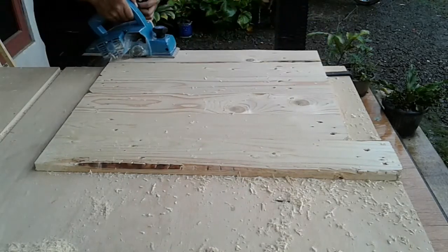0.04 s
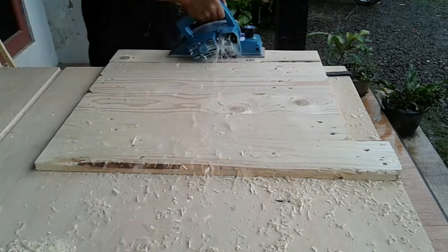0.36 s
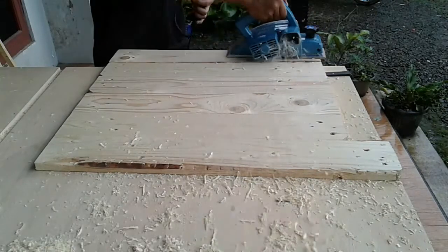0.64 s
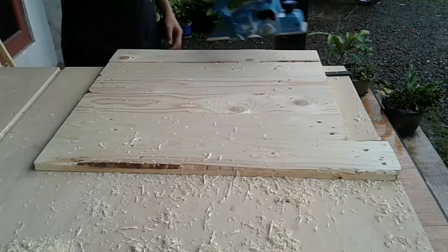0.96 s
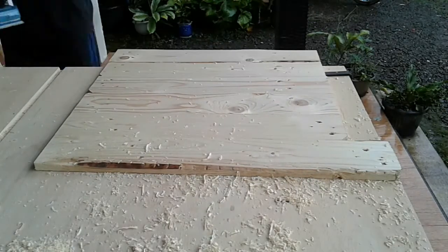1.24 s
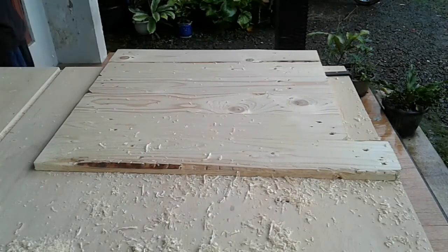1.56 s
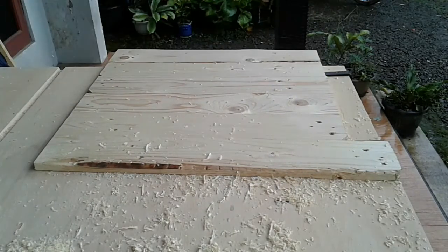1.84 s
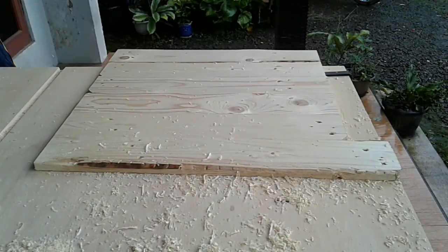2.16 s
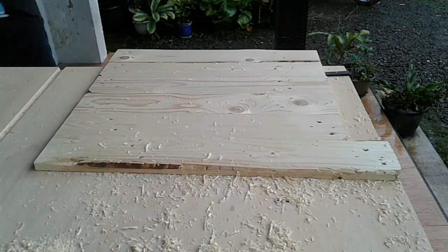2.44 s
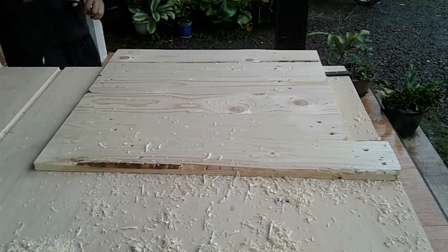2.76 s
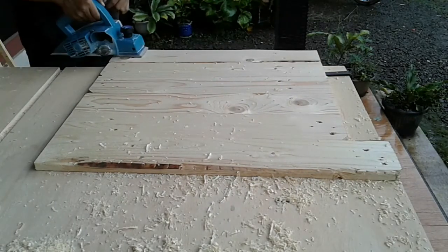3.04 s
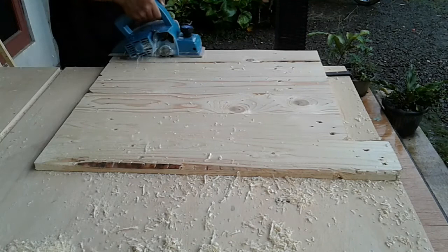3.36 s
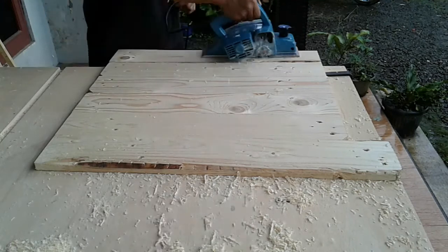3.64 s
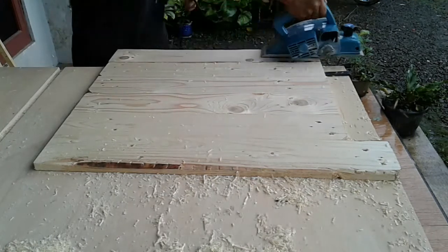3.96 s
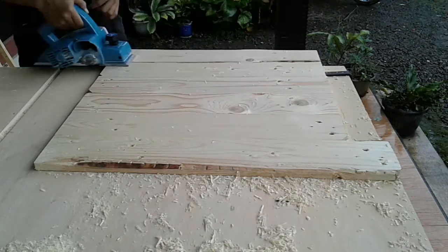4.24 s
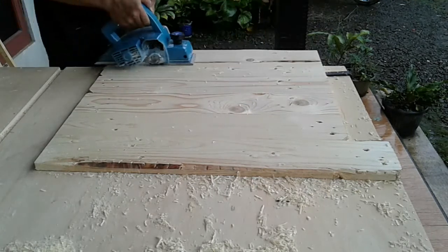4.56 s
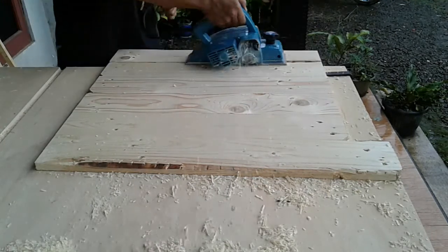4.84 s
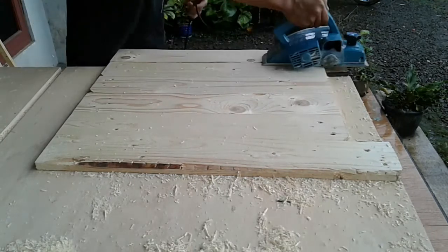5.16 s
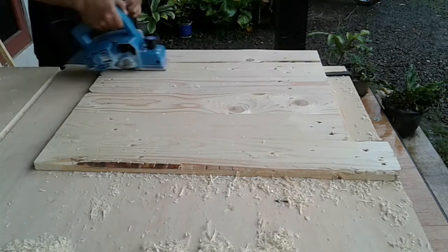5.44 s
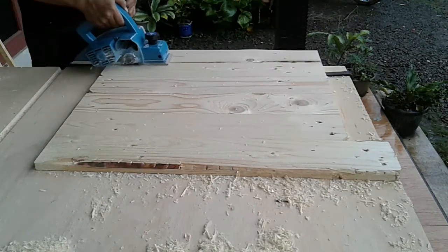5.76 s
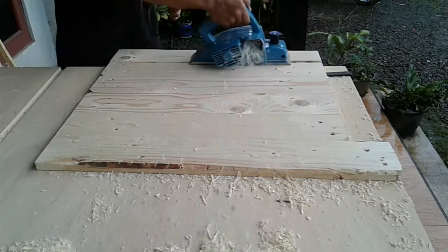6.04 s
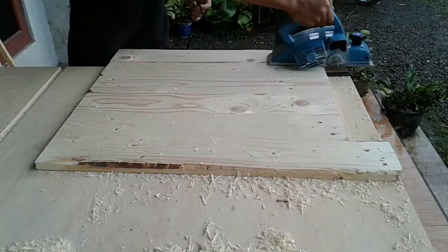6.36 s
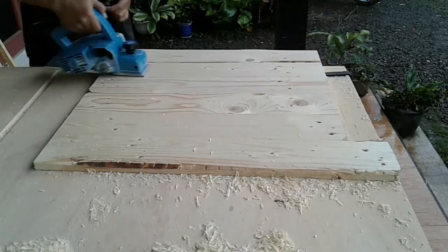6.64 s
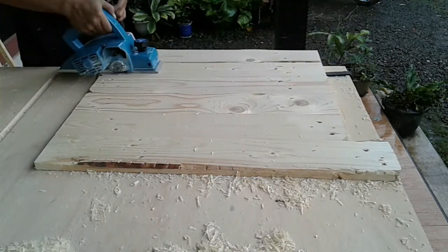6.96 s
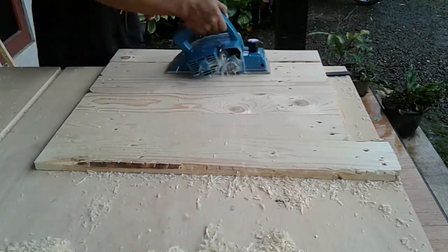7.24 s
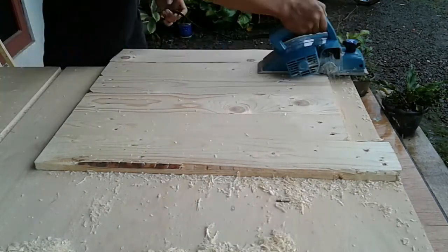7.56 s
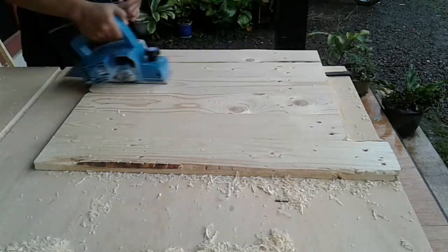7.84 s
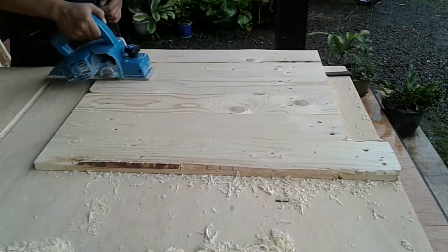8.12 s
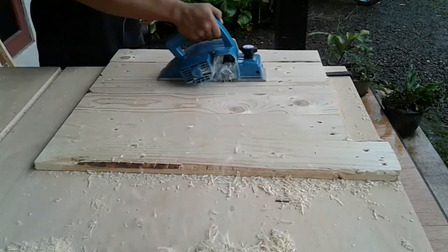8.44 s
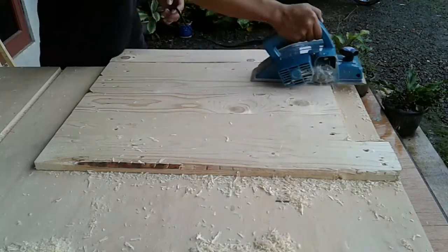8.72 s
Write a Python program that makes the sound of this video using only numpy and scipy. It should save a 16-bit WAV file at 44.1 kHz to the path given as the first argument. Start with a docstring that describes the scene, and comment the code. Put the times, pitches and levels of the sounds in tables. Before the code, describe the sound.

An electric hand planer is already cutting a wooden panel about a metre away, with a siren-like howl, rushing air, bright hiss and a crackling rasp of chips. The stroke ends at 0.8 seconds; the motor is switched off and its whine falls steadily. Faint squeaks come just after 2 seconds, then light handling ticks and a soft knock at 2.9. At 3 seconds it restarts with a sputtering, quickly rising whine and cuts until 3.9. Four more strokes follow at about 4.4 to 5.2, 5.6 to 6.4, 6.9 to 7.6 and 8.1 to 8.8 seconds. The pitch sags during each of these and climbs again between them. The tool's base knocks and briefly buzzes on the board, mostly between cuts. The open workshop gives short reflections over very faint outdoor noise.

```python
"""An open workshop, where an electric hand planer works along a wooden panel about a metre away.
Its knife drum howls like a siren and sags in pitch as the knives bite, each one snapping off a chip.
The motor hums and whistles, the fan rushes, the brushes hiss and the sole knocks on the board.
After the first stroke it is switched off and coasts down, is set on the board, restarts and makes
five more strokes. Nearby walls answer briefly, and a quiet yard lies beneath."""
import sys
import numpy as np
from scipy import signal
from scipy.fft import rfft, irfft, next_fast_len
from scipy.io import wavfile
from scipy.ndimage import uniform_filter1d, map_coordinates

SR = 44100
rng = np.random.default_rng(int(sys.argv[2]) if len(sys.argv) > 2 else 0)


def dump_mix(stems):
    """Bounce the given channels to the path in sys.argv[1] as a 16-bit WAV at rate SR."""
    frames = np.atleast_2d(stems).T  # one column per channel
    limited = np.clip(frames, -1, 1)  # hard clip at full scale
    pcm = np.round(limited * 32767).astype(np.int16)
    wavfile.write(sys.argv[1], SR, pcm)


N = 396459

OFF_S, ON_S = 0.921, 2.973  # the switch opens, then closes again
CRAWL_HZ = 60  # slowest knife rate, in knife passes a second

# Bright sizzle of brushes and splinters. Each row: frequency in Hz, relative level in dB.
SIZZLE = [(2000, -53), (4500, -37), (6500, 5), (8500, 3), (10000, 3), (11500, 1.5), (14000, 5.5),
          (16000, -2)]
# Low body of the shaking bench and panel. Each row: frequency in Hz, relative level in dB.
RUMBLE = [(20, 0), (120, -.5), (300, 1.5), (450, 0), (650, -3), (1200, -14), (3000, -40)]
# Strokes along the board. Each row: knives enter and leave in seconds, then rasp level,
# sharp edge level, entry surge and exit surge in dB.
STROKES = [(-0.15, 0.823, -24.5, -21.5, 0, 4.5), (3.131, 3.919, -27.5, -22.5, 11, 8),
           (4.355, 5.185, -26, -22, 1.5, 9.5), (5.635, 6.363, -30.5, -24, 13, 13.5),
           (6.856, 7.61, -28, -22, 3.5, 8.5), (8.05, 8.801, -29, -23, 4.5, 8.5)]


def amp(db):
    """Decibels to gain."""
    return 10 ** (np.asarray(db) / 20)


def unit(x):
    """Scale to rms 1."""
    return x / np.sqrt(np.mean(x ** 2) + 1e-20)


def along(points, hz):
    """Read (Hz, value) points on a log frequency axis."""
    freqs, values = np.transpose(points)
    return np.interp(np.log(hz + 1), np.log(freqs), values)


def curves(rows, at):
    """Each column after the first, read at the given values of the first."""
    x, *columns = np.transpose(rows)
    return [np.interp(at, x, column) for column in columns]


def wobble(rate):
    """A smooth random curve, rate knots a second."""
    at = np.linspace(0, N, 8000)
    coarse = map_coordinates(rng.standard_normal(int(N * rate / SR) + 4), [at * rate / SR])
    return np.interp(np.arange(N), at, coarse)


def filtered(x, response):
    """Filter x by a response given as a function of Hz."""
    size = next_fast_len(N + SR // 2)
    return irfft(rfft(x, size) * response(np.fft.rfftfreq(size, 1 / SR)), size)[..., :N]


def coloured(x, spectrum):
    """EQ x with a (Hz, dB) curve and scale it to rms 1."""
    return unit(filtered(x, lambda hz: amp(along(spectrum, hz))))


def noise(patchy_db):
    """White noise with drifting patches of random gain."""
    bins = signal.stft(rng.standard_normal(N), nperseg=512)[2]
    patches = uniform_filter1d(rng.standard_normal(bins.shape), size=3, axis=0)
    patches = uniform_filter1d(patches, size=22, axis=1)
    return unit(signal.istft(bins * amp(patchy_db * unit(patches)))[1][:N])


def add_burst(track, start_s, db, t60):
    """Mix in a noise burst that falls 60 dB in t60 seconds."""
    t = np.arange(SR // 5) / SR
    burst = amp(db - 60 * t / t60) * rng.standard_normal(len(t))
    part = track[round(start_s * SR):][:len(t)]
    part += burst[:len(part)]


def partial(cycles, flutter, drift_db):
    """A sine of rms 1, fluttering in the turbulent air and drifting in level as the tool moves."""
    phase = 2 * np.pi * (cycles + rng.random()) + flutter * wobble(170)
    return unit(np.sin(phase) * (1 + flutter * wobble(170)) * amp(drift_db * wobble(7)))


def speed_db(rate, rated_db, per_octave):
    """Level that is rated_db at a knife rate of 700 Hz and gains per_octave dB as the speed doubles."""
    return rated_db + per_octave * np.log2(rate / 700)


def knife_rate(now):
    """Knife passes a second: sagging in wood, recovering in air, coasting down, leaping at the restart."""
    # The drum labouring, one list a stroke. Each point: time in seconds, knife rate in Hz.
    loaded = [
        [(0.0, 721), (0.06, 680.4), (0.136, 648.1), (0.234, 640), (0.296, 616.2), (0.39, 611.3), (0.476, 597.0),
         (0.604, 584.4), (0.682, 590.2), (0.825, 593.6)],
        [(3.1, 537.1), (3.134, 575.6), (3.208, 627.9), (3.296, 663.4), (3.376, 687.7), (3.556, 708.9),
         (3.618, 725.1), (3.634, 722), (3.714, 692.5), (3.92, 667.4)],
        [(4.36, 806), (4.442, 785), (4.526, 753), (4.688, 709.8), (4.832, 694.5), (4.876, 676), (4.91, 664),
         (4.958, 657.4), (5.118, 667), (5.18, 653.4)],
        [(5.64, 803), (5.67, 800.6), (5.798, 751.3), (5.88, 741), (6.038, 710), (6.102, 670), (6.152, 671),
         (6.254, 675), (6.308, 674), (6.36, 663)],
        [(6.89, 813), (6.958, 791.5), (7.022, 767.4), (7.248, 689.4), (7.308, 683.7), (7.396, 692.5),
         (7.45, 680.6), (7.572, 678), (7.6, 665)],
        [(8.08, 819), (8.136, 793), (8.25, 719), (8.32, 679), (8.38, 671), (8.484, 637), (8.564, 613),
         (8.64, 603), (8.716, 606.2), (8.8, 624.5)],
    ]
    free_hz, restart_hz = 839.4, 149.6
    drag_s, friction_hz = 2.25, 620.5  # air drag and friction brake the coasting rotor
    rate = np.zeros(N)
    for stroke in loaded:
        (begin, _), (end, end_hz) = stroke[0], stroke[-1]
        recover_s = 0.25 * (end_hz / 660) ** 1.6  # quicker from a deep sag
        regained = (free_hz - end_hz) * (1 - np.exp(-np.maximum(now - end, 0) / recover_s))
        rate = np.where((now >= begin) | (rate == 0), curves(stroke, now)[0] + regained, rate)
    coast = (np.interp(OFF_S, now, rate) + friction_hz) * np.exp((OFF_S - now) / drag_s) - friction_hz
    coast = np.maximum(coast, CRAWL_HZ)
    running_s, running_hz = loaded[1][0]
    progress = np.clip((now - ON_S) / (running_s - ON_S), 0, 1)
    spin_up = restart_hz + (running_hz - restart_hz) * progress ** 0.85
    return np.select([now < OFF_S, now < ON_S, now < running_s], [rate, coast, spin_up], rate)


def travel(now):
    """Place in the round trip: 0-1 along the cut, 1-2 on the lifted way back."""
    held_place, lift_s = 1.42, 0.21  # where the tool waits as it coasts, and the time to get there
    marks = [(s, 2 * k + end) for k, stroke in enumerate(STROKES) for end, s in enumerate(stroke[:2])]
    marks += [(STROKES[0][1] + lift_s, held_place), (ON_S, held_place)]
    marks += [(STROKES[-1][1] + 0.39, 2 * len(STROKES))]
    return curves(sorted(marks), now)[0] % 2


def bite(now):
    """Wood contact (0-1) and gains of rasp and edge; the bite is hardest at the ends and in tough wood."""
    # Tough patches in the wood. Each row: centre and half length in seconds, extra bite in dB.
    tough = [(0.095, 0.031, 0.5), (0.485, 0.035, 3.5), (0.757, 0.1, 6), (3.65, 0.16, 3), (4.874, .025, 6),
             (5.767, 0.016, 5.5), (6.089, 0.031, 4.5), (8.52, .02, 6), (8.624, 0.023, 7)]
    grip_s, release_s = 0.007, 0.008
    entry_delay_s, entry_width_s, exit_s = 0.035, 0.034, 0.061
    tough_db = sum(db * np.exp(-((now - s) / half) ** 2) for s, half, db in tough) + 1.95 * wobble(14)
    contact, rasp, edge = np.zeros((3, N))
    for enter, leave, rasp_db, edge_db, entry_db, exit_db in STROKES:
        near = (now > enter - 0.1) & (now < leave + 0.1)
        t = now[near]
        grip = (1 + np.tanh((t - enter) / grip_s)) / 2 * np.exp(-np.maximum(t - leave, 0) / release_s)
        surge_db = tough_db[near] + entry_db * np.exp(-((t - enter - entry_delay_s) / entry_width_s) ** 2)
        surge_db += exit_db * np.exp(-np.abs(t - leave) / exit_s)
        contact[near] += grip
        rasp[near] += grip * amp(rasp_db + surge_db)
        edge[near] += grip * amp(edge_db + 0.61 * surge_db)  # only part of a surge reaches the treble
    return contact, rasp, edge


def yard():
    """A faint, slowly shifting bed of outdoor noise."""
    # Tone of the yard. Each row: frequency in Hz, relative level in dB.
    spectrum = [(15, -51), (25, -16), (33, -38), (119, -33), (173, -18), (274, -6.5), (389, -4.5),
                (421, -6.5), (537, -7), (614, -10.5), (997, -10), (1110, -15), (2060, -16), (15500, -30)]
    return amp(-51) * coloured(noise(patchy_db=4), spectrum)


def walls(x):
    """A short, thin answer from the nearby walls."""
    # Decay of the reflections. Each row: frequency in Hz, time to fall 60 dB in seconds.
    decay = [(200, 0.21), (2000, 0.094), (12000, 0.023)]
    hz, t, bins = signal.stft(rng.standard_normal(SR // 3), SR, nperseg=256)
    tail = signal.istft(bins * amp(-60 * t / along(decay, hz)[:, None]))[1]
    return signal.fftconvolve(x, np.pad(tail, (300, 0)) / np.linalg.norm(tail))[:N]


def drive_squeaks(now):
    """The drive sings briefly as it runs down."""
    # Each row: centre in seconds, pitch in Hz, half length in seconds, level in dB.
    squeaks = [(2.02, 1380, .04, -54), (2.161, 2125, 0.059, -51), (2.227, 1220, 0.047, -53)]
    return sum(amp(db - 9.2 * ((now - s) / half) ** 2) * partial(hz * now, flutter=0.33, drift_db=-2)
               for s, hz, half, db in squeaks)


def handling_ticks():
    """A hand ticks against the shell of the resting tool."""
    # Each row: start in seconds, relative level in dB, time to fall 60 dB in seconds.
    touches = [(2.502, -49, 0.12), (2.5413, -38, 0.11), (2.564, -48, 0.11), (2.7182, -41, 0.1),
               (2.8044, -43, 0.11)]
    shell = [(1200, -20), (3100, 0), (4500, 0), (6200, -5), (9000, -13), (15000, -14)]  # Hz, dB
    ticks = np.zeros(N)
    for s, db, t60 in touches:
        add_burst(ticks, s, db, t60)
    return amp(-11) * filtered(ticks, lambda hz: unit(amp(along(shell, hz))))


def sole_knocks():
    """The sole lands on the panel: a woody clack over a dull thud from the bench."""
    # Each row: start in seconds, relative levels of clack and thud in dB.
    knocks = [(2.902, -32.5, -35), (2.93, -44, -53), (4.134, -26.5, -58), (4.826, -27.5, -47),
              (5.404, -28.5, -47), (6.077, -30, -43), (6.589, -30, -50), (7.039, -40, -42),
              (7.829, -31, -56), (8.079, -39, -40)]
    # Modes of the panel. Each row: frequency and width in Hz, relative level in dB.
    modes = [(430, 110, -7.5), (614, 120, 2.5), (1250, 450, 7), (1800, 180, 7), (2310, 180, 4),
             (3920, 500, -20)]
    bench = [(60, -32), (200, -15), (380, 0), (600, -4), (1500, -38), (5000, -70)]  # Hz, dB
    clack, thud = np.zeros((2, N))
    for s, clack_db, thud_db in knocks:
        add_burst(clack, s, clack_db, t60=0.065)
        add_burst(thud, s, thud_db, t60=0.063)

    def panel(hz):
        """The panel's resonances, summed with alternating polarity."""
        return unit(sum((-1) ** k * amp(db) * 1j * hz * width / (centre ** 2 - hz ** 2 + 1j * hz * width)
                        for k, (centre, width, db) in enumerate(modes)))

    return amp(-7) * filtered(clack, panel) + amp(4) * filtered(thud, lambda hz: unit(amp(along(bench, hz))))


def sole_chatter(now):
    """The front of the sole buzzes as it settles on the panel, ringing one of its modes."""
    # Each row: centre and half length in seconds, level in dB.
    buzzes = [(4.245, 0.042, -25.5), (5.591, 0.04, -25), (6.712, 0.021, -38), (6.811, 0.039, -23),
              (7.91, 0.042, -34)]
    touch = sum(amp(db - 10.6 * ((now - s) / half) ** 2) for s, half, db in buzzes)
    return touch * partial(825 * now, flutter=0.81, drift_db=3)


def bench_rumble(rate, contact, inrush):
    """The tool shakes the bench, harder in the cut and at the restart."""
    level_db = speed_db(rate, -56.5, per_octave=10.6) + 6.6 * contact + 6 * inrush + 1.5 * wobble(12)
    return amp(level_db) * coloured(noise(patchy_db=1.5), RUMBLE)


def sputter(now, inrush, mains_hz=50):
    """A gain that pulses with the starting current on every mains half-wave."""
    return amp(inrush * (3.5 * np.cos(4 * np.pi * mains_hz * now) + 2.5 * wobble(250) - 1.5))


def fan_rush(passes, rate, place, inrush):
    """The fan's air, chopped by the drum, meets the board as the sole comes down."""
    # Tone of the rush. Each row: frequency in Hz, relative level in dB.
    spectrum = [(200, -28), (500, -19.5), (850, -8), (1100, -5.5), (1400, -2.5), (1750, -0.5), (2300, 0),
                (3000, 1.5), (3900, 2.5), (4500, -1.5), (6000, 0), (8000, -11), (15000, -12.5)]
    # Air striking the board. Each row: place in the round trip, gain in dB.
    downwash = [(0, 1), (.15, -3), (.6, 0), (1, 1.5), (1.35, -1), (1.8, 1), (2, 2)]
    chop = 1 + 0.25 * np.cos(2 * np.pi * passes) + 0.21 * np.cos(np.pi * passes)
    flow_db = speed_db(rate, -26.5, per_octave=11.2) + curves(downwash, place)[0] + 2.2 * inrush
    flow = amp(flow_db) + amp(-27.5) * inrush
    return flow * coloured(noise(patchy_db=3.5) * chop, spectrum)


def brush_hiss(passes, rate, contact, inrush, power_off):
    """The brushes spark and hiss, and keep scraping until the rotor all but stops."""
    sparks = amp(1.6 * wobble(400)) * (1 + 0.13 * np.cos(2 * np.pi * passes))
    scrape = amp(-63) * np.clip((rate - CRAWL_HZ) / 25, 0, 1)
    hiss_db = speed_db(rate, -28.5, per_octave=9.74) + 0.3 * contact + 6 * inrush - 1.5 * power_off
    return (scrape + amp(hiss_db)) * coloured(noise(patchy_db=-0.4) * sparks, SIZZLE)


def motor_hum(passes, rate, inrush):
    """The belt-coupled armature and its fan hum between the harmonics of the drum."""
    # Each row: multiple of the knife rate, relative level in dB.
    tones = [(1.4, -16.5), (1.75, -2.5), (3.5, -7), (3.65, -10), (4.55, -9), (4.75, -7), (6.75, -10),
             (7.7, -9)]
    # Hum against speed. Each row: knife rate in Hz, gain in dB.
    levels = [(100, -85), (180, -68), (350, -66), (460, -52), (600, -42.5), (675, -50.5), (715, -31),
              (780, -32.5), (815, -30.5)]
    hum = sum(amp(db) * partial(k * passes, flutter=0.081 * k, drift_db=4) for k, db in tones)
    return amp(curves(levels, rate)[0] + 6.6 * inrush) * hum


def commutator_whistle(passes, rate, contact, inrush, power_off):
    """The commutator bars pass under the brushes with a breathy whistle that fades under load."""
    bars = 21 * passes
    fast = np.clip((rate - 350) / 130 + inrush, 0.15, 1)  # at low speed the octave takes over
    tone = fast * partial(bars, flutter=0.36, drift_db=0)
    tone += 2.7 * (1 - fast) * partial(2 * bars, flutter=1, drift_db=3)
    # uneven bars and hopping brushes spread each tone into a narrow band
    hop = coloured(rng.standard_normal(N), [(150, -9), (500, -5), (1100, 3), (2500, -39)])
    spread = 0.56 + 1.1 * inrush
    level_db = speed_db(rate, -26, per_octave=20) - 10 * contact + 16 * inrush - 5 * power_off
    return amp(level_db) * tone * (1 + spread * hop) / np.hypot(1, spread)


def chip_snaps(passes):
    """One click a knife pass as a chip snaps off; harder wood holds the knife back and snaps louder."""
    strike = np.interp(np.arange(1, int(passes[-1])), passes, np.arange(N))
    jitter, scatter = rng.standard_normal((len(strike), 2)).T
    hardness = wobble(90)[strike.astype(int)]
    strike += SR * (2.2e-6 * jitter + 5e-6 * hardness)
    size = amp(0.5 * scatter + 1.2 * hardness)
    # a windowed sinc places each click between samples
    taps = np.floor(strike)[:, None] + np.arange(-7, 9)
    offset = taps - strike[:, None]
    clicks = size[:, None] * np.sinc(offset) * np.cos(np.pi * offset / 16) ** 2
    return np.bincount(np.clip(taps, 0, N - 1).astype(int).ravel(), clicks.ravel(), N)


def cut(passes, rasp_gain, edge_gain):
    """Snapping chips rasp through the panel, splinters crackle away and a hard bite makes it shudder."""
    # The rasp and its sharp treble edge. Each row: frequency in Hz, relative level in dB.
    rasp_spectrum = [(1500, -39), (2400, -3), (2950, -5.5), (3500, -1.5), (4100, 1), (4700, -3),
                     (5400, 0.5), (6200, -6), (6800, -14), (8000, -29), (12000, -54)]
    edge_spectrum = [(4000, -35), (6300, -6.5), (7200, 1.5), (7800, -3), (8350, 2.5), (9000, 0), (10500, 0),
                     (13000, -0.5), (16000, -1.5)]
    snaps = chip_snaps(passes)
    echoed = snaps.copy()
    # echoes within the board shift as the planer travels
    for delay_ms, db in [(0.23, -1.5), (0.61, -0.5), (1.9, -2.5), (4.3, -2.5)]:
        lag = (delay_ms + 0.063 * wobble(4)) * SR / 1000
        echoed += amp(db) * map_coordinates(snaps, [np.arange(N) - lag])
    # bending waves in the panel smear each snap, treble arriving first
    smeared = filtered(echoed, lambda hz: np.exp(-2j * np.pi * 0.3 * np.sqrt(hz)))
    rasp = rasp_gain * coloured(smeared, rasp_spectrum)
    edge = amp(1.2) * edge_gain * coloured(smeared, edge_spectrum)
    splinters = rng.standard_normal(N) * (rng.random(N) < 900 / SR)  # about 900 a second
    crackle = amp(-28) * edge_gain * coloured(splinters, SIZZLE)
    shudder = amp(-26.5) * rasp_gain * coloured(noise(patchy_db=0.5), RUMBLE)
    return rasp + edge + crackle + shudder


def swell_db(now, harmonic):
    """One harmonic of the siren rings out or fades for a moment."""
    # Each row: centre and half length in seconds, harmonic number, boost or dip in dB.
    swells = [(0.054, .04, 2, 8), (0.35, 0.19, 1, -8.5), (0.524, 0.051, 4, 10.5), (0.704, .1, 2, -5),
              (0.788, 0.053, 4, 6), (0.97, .06, 2, 5), (1.29, .07, 6, 9), (1.55, 0.23, 4, 4.5),
              (3.104, 0.021, 2, 11.5), (3.23, 0.027, 2, 14), (3.714, 0.13, 1, 6), (4.56, 0.069, 1, -7),
              (4.6, 0.029, 4, 8), (4.733, 0.056, 2, 7), (5.031, 0.066, 1, 8.5), (5.035, .05, 2, 5),
              (5.82, .1, 1, -9), (5.8, 0.095, 2, -10), (6.681, 0.028, 3, 8), (6.87, 0.06, 2, -7.5),
              (6.961, 0.058, 1, 5.5), (7.319, 0.092, 2, 8), (7.299, .17, 1, 5.5), (7.37, .06, 4, 8.5),
              (7.491, .03, 3, 8), (8.028, 0.051, 2, -13), (8.244, 0.032, 1, 14), (8.523, 0.21, 2, -9),
              (8.4, 0.097, 3, -9), (8.651, 0.19, 1, -11), (1.14, .06, 2, -7), (1.17, .08, 4, -7),
              (4.1, .08, 4, -4)]
    return sum(db * np.exp(-np.minimum(((now - s) / half) ** 2, 20))
               for s, half, k, db in swells if k == harmonic)


def drum_siren(now, passes, rate, place, contact, inrush):
    """The knives howl like a siren; overtones whine in the housing and dip when wood closes the mouth."""
    # Every round trip colours the howl alike. Each row: place, relative levels of harmonics 1-4 in dB.
    howl_levels = [(0.0, -23.2, -24.7, -28.2, -35), (0.12, -29, -32.1, -29.5, -27.5),
                   (0.3, -33, -37.5, -32, -30.5), (0.45, -27.5, -34.5, -31, -27),
                   (0.65, -27, -34.5, -30.5, -25), (0.82, -28.2, -30.5, -28.5, -29.5),
                   (0.95, -29, -32, -27, -21), (1.1, -25.5, -29, -34, -24.5), (1.22, -52, -29, -36, -28.0),
                   (1.4, -52, -31.5, -40, -28), (1.6, -27.5, -33, -31, -26),
                   (1.8, -27.5, -32.9, -33.5, -29.5), (2.0, -22, -22, -32, -27)]
    # The whine above the howl. Each row: harmonic number, relative level in dB.
    overtones = [(5, -4), (6, 3), (7, -2), (8, -0.5), (9, -9), (10, -5.5), (11, -28), (12, -5.5),
                 (14, -8.5), (16, -2.5)]
    # Resonances of the mouth round the drum and of the housing. Each row: frequency in Hz, gain in dB.
    mouth = [(300.0, 5.6), (600.0, -7), (680.0, -2.9), (850.0, -4), (1150.0, -2.5), (1300.0, 5.5),
             (1750.0, 0.5), (2100.0, -1.6), (2400.0, 1.0), (2650.0, -5.5), (3000.0, 4.5), (3300.0, -1)]
    housing = [(400, -8), (1300, 4), (2200, 2), (3100, 13), (4200, 4), (7000, 4.5), (15000, -3.5)]
    howl, whine = np.zeros((2, N))
    for k, db in enumerate(curves(howl_levels, place), 1):
        gain = amp(db + along(mouth, k * rate) + swell_db(now, k))
        howl += gain * partial(k * passes, flutter=0.086 * np.sqrt(k), drift_db=2.2)
    for k, db in overtones:
        gain = amp(db + along(housing, k * rate) + swell_db(now, k))
        whine += gain * partial(k * passes, flutter=0.075 * k, drift_db=4)
    howl *= amp(speed_db(rate, 0.22, per_octave=16.7) + 7 * inrush)
    whine *= amp(speed_db(rate, -37, per_octave=12.3) - 3.1 * contact)
    spinning = np.clip(rate / 150 - 0.7, 0, 1)
    growl = amp(3.5 * inrush * wobble(200))
    return spinning * growl * (howl + whine)


def scene():
    """One shaft speed drives the planer's running parts; knocks, walls and the yard surround them."""
    now = np.arange(N) / SR
    rate = knife_rate(now) * (1 + 0.000797 * wobble(35))
    passes = np.cumsum(rate) / SR  # running count of knife passes
    place = travel(now)
    inrush = (now > ON_S) * np.exp(-((now - ON_S) / 0.17) ** 4)  # starting current, 0-1
    power_off = np.clip((now - OFF_S) / 0.2, 0, 1) * (now < ON_S)  # rises to 1 as the sparking dies
    contact, rasp_gain, edge_gain = bite(now)
    planer = drum_siren(now, passes, rate, place, contact, inrush)
    planer += motor_hum(passes, rate, inrush)
    planer += commutator_whistle(passes, rate, contact, inrush, power_off)
    pulsing = sputter(now, inrush)
    rush = fan_rush(passes, rate, place, inrush) + brush_hiss(passes, rate, contact, inrush, power_off)
    planer += bench_rumble(rate, contact, inrush)
    planer += pulsing * amp(0.32 * wobble(9.6)) * rush
    planer += cut(passes, rasp_gain, edge_gain)
    planer += sole_chatter(now) + sole_knocks() + drive_squeaks(now) + handling_ticks()
    mix = planer + amp(-9.5) * walls(planer) + yard()
    return np.array([mix, mix])


def record(dry, ceiling=0.8, top_hz=15850):
    """A soft clip rounds off the highest peaks, and a steep low-pass removes the very top."""
    rounded = dry / (1 + (dry / ceiling) ** 6) ** (1 / 6)
    return filtered(rounded, lambda hz: hz < top_hz)


dry = scene()
out = record(dry)
dump_mix(out)
```